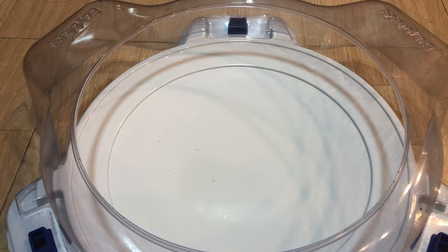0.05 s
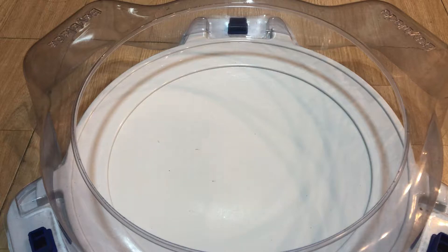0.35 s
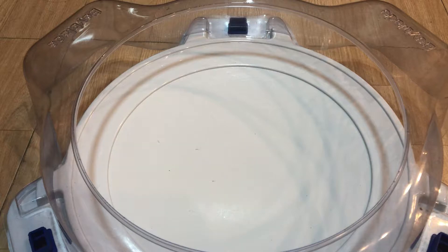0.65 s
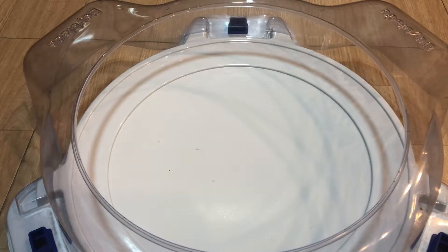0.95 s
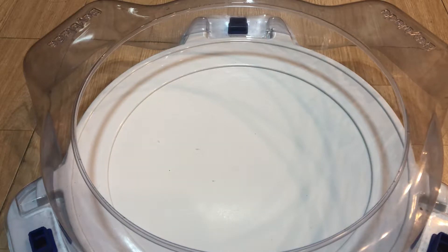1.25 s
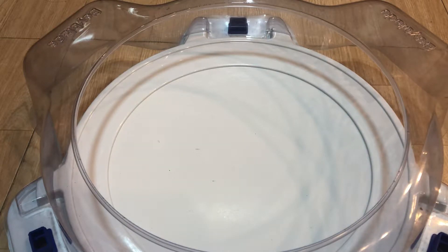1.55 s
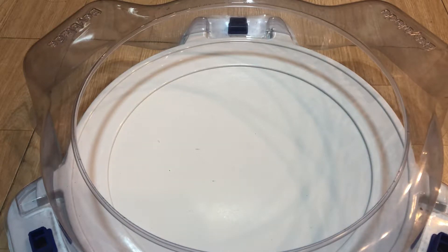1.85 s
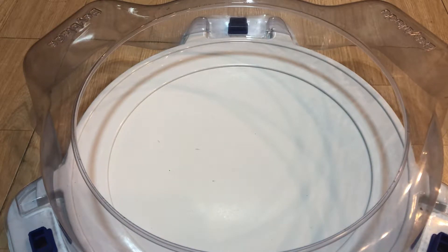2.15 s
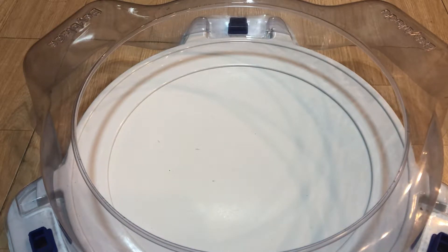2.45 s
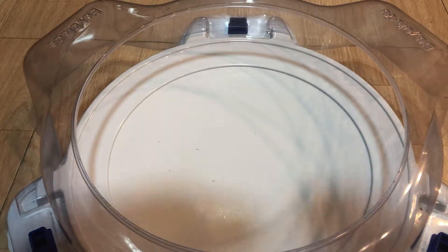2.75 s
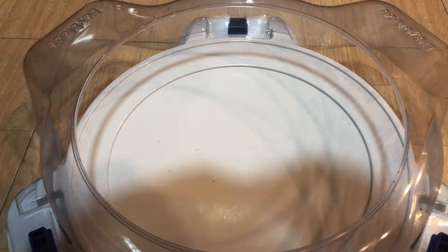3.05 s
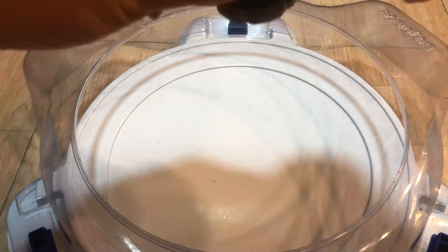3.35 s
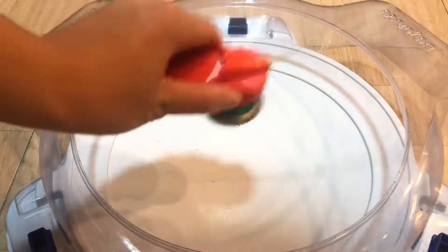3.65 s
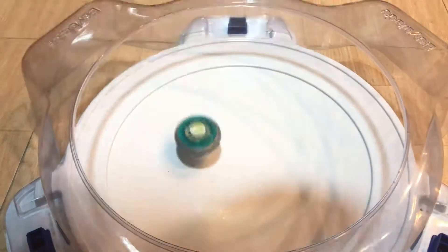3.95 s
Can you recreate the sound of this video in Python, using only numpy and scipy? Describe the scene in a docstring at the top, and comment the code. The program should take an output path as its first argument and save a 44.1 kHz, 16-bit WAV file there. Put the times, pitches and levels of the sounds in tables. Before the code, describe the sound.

A toy top is launched, close by in a small room. First come faint, scattered plastic clicks and dull floor bumps, with two tiny metal clinks around 2.4 seconds. From 3.5 seconds the launcher's gears rip, quickly growing faster and louder, and the top snaps free near 3.7. It hits a thin plastic bowl with a loud hollow crack, scrapes briefly under continued rattling, and lands again at 4 seconds.

```python
"""Launching a toy top

In a small room a toy top is clicked onto its plastic launcher, with dull bumps through the floor.
The launcher is pulled: its gear teeth rip ever faster, the top snaps free, drops into a thin plastic
bowl, bounces and lands again on tip and rim, while the mechanism rattles on.
The close microphone overloads softly on the landings."""
import sys
import numpy as np
from scipy import signal
from scipy.fft import rfft, irfft, next_fast_len
from scipy.io import wavfile
from scipy.ndimage import map_coordinates

SR = 44100
rng = np.random.default_rng(int(sys.argv[2]) if len(sys.argv) > 2 else 0)


def generate_wav(signal):
    """Clip the signal to [-1, 1] and save it as 16-bit WAV at the path in sys.argv[1]."""
    frames = np.transpose(np.atleast_2d(signal))
    scaled = np.clip(frames, -1, 1) * 32767
    pcm = np.round(scaled).astype(np.int16)
    wavfile.write(sys.argv[1], SR, pcm)


N = 176400
TIME = np.arange(N) / SR
HIT_TIME = TIME[:12000]  # seconds since a hit

# The pull. Each row: time in seconds, rattle in dB, teeth per second, treble boost in dB, whirr in dB.
CORD_PULL = [(3.481, -68, 90, 10, -94), (3.52, -56.5, 97.7, 4, -62), (3.555, -48, 124.4, 0.5, -53.5),
             (3.598, -30, 240, -0.5, -47), (3.615, -24, 305, -3, -29.5), (3.642, -25.5, 425, 3.5, -24),
             (3.665, -18.5, 490, -1, -35), (3.684, -26, 490, 9, -46), (3.71, -22, 460, -5, -40),
             (3.744, -64, 500, -10, -65), (3.79, -36, 510, -1, -58), (3.85, -30.5, 420, -2, -49.5),
             (3.92, -32.5, 390, -1.5, -42.5), (4.0, -34, 370, -1, -52)]
# The gears' tone. Each row: harmonic number, level in dB.
GEAR_HARMONICS = [(1, 0.5), (2, -5), (3, -6), (4, -5)]
# The launcher shell's tone colour. Each row: frequency in Hz, level in dB.
SHELL_COLOUR = [(100, -20), (350, -11), (850, -9.5), (1200, -0.5), (1600, -1), (2000, -7.5), (2600, -2.5),
                (4500, -2), (6500, -1), (8200, -4), (11000, -9), (13000, -6.5), (15500, -11)]
# The shell's resonances. Each row: frequency in Hz, width in Hz, level in dB.
SHELL_PEAKS = [(1460, 160, 1), (1600, 160, -0.5), (2330, 230, 9), (4050, 240, 6), (6080, 120, 5.5)]


def launcher(cycles_per_tooth=4, cord_rub=0.6):
    """Teeth tick, the cord rubs and the gears' whirr sweeps up through the shell's resonances."""
    times, *columns = np.transpose(CORD_PULL)
    rattle_db, rate, treble_db, whirr_db = [np.interp(TIME, times, c) for c in columns]
    pulling = TIME > times[0]
    teeth_passed = np.cumsum(rate) / SR
    tooth_number = np.floor(teeth_passed + 0.24 * wobble(300))  # slightly uneven timing
    hits = np.flatnonzero(np.diff(tooth_number) > 0)
    teeth = np.zeros(N)
    teeth[hits] = amp(3.5 * rng.standard_normal(N)[hits])
    contact = signal.fftconvolve(teeth, fade(HIT_TIME, t60=0.005))[:N]
    rattle = (contact / contact[pulling].std() + cord_rub) * rng.standard_normal(N)
    rattle *= amp(rattle_db + wobble(140)) / rattle[pulling].std()  # the spool runs unevenly
    phase = 2 * np.pi * cycles_per_tooth * teeth_passed + 1.35 * wobble(250)
    gears = sum(amp(db + 5.2 * wobble(200)) * np.sin(k * phase) for k, db in GEAR_HARMONICS)
    jolts = 1 + 0.8 * np.cos(2 * np.pi * teeth_passed)  # each tooth jolts the whirr's level
    whirr = amp(whirr_db) * unit(gears) * unit(jolts)
    shell = lambda hz: shape(SHELL_COLOUR)(hz) * np.hypot(1, peaks(SHELL_PEAKS)(hz))
    rip = coloured((rattle + whirr) * pulling, shell)
    treble = signal.sosfiltfilt(signal.butter(3, 8000, "high", fs=SR, output="sos"), rip)
    return in_room(rip + (amp(treble_db) - 1) * treble, wet_db=-7)


# The top hits the bowl. Each row: start in seconds, thump in dB, crack in dB.
BOWL_HITS = [(3.7582, -11.5, -6), (3.9884, -12, -8.5), (3.9928, -17, -28)]
# The bowl's ringing notes. Each row: frequency in Hz, level in dB, seconds to fade by 60 dB.
BOWL_NOTES = [(228.5, -2.5, 0.44), (302.5, 5, 0.17), (339, 2, 0.25), (416, 4, 0.14), (445, 1, 0.062),
              (527, 2, 0.16), (575, -1.5, 0.28), (662, -13, 0.28), (726, -3.5, 0.38), (893, -13, 0.2),
              (1026, -12, 0.4), (1580, -8, 0.56)]
# The bowl's thin cover shakes. Each row: peak time in seconds, level in dB, spread in seconds.
COVER_SHUDDERS = [(3.788, -15.5, 0.01), (3.815, -26, 0.023)]
# Tone colours of the crack, the flexing bowl and its cover. Each row: frequency in Hz, level in dB.
CRACK_COLOUR = [(90, -15), (350, 3), (1000, 1), (1550, 10.5), (2100, 2), (3200, 6.5), (6000, -1.5),
                (7500, 3), (10000, -3.5), (12000, -2), (15500, 0.5)]
FLEX_COLOUR = [(40, -12), (130, -7.5), (230, -2), (350, -5), (520, -0.5), (750, -13.5), (1300, -36.5),
               (3000, -53)]
COVER_COLOUR = [(130, -25), (220, 3), (400, -9), (560, 3), (740, 2.5), (1100, -11.5), (1330, -11.5),
                (1550, -14), (2000, -15), (2900, -17), (6000, -36)]


def bowl(flex_delay_s=0.00304, lowest_hz=133):
    """The tip cracks on the bowl, which flexes once and rings like a drum; its cover shudders."""
    out = coloured(swells(COVER_SHUDDERS) * grit(rough_db=0.5, rate=200), shape(COVER_COLOUR))
    flex = amp(28) * coloured(signal.unit_impulse(len(HIT_TIME)), shape(FLEX_COLOUR))
    for start, thump_db, crack_db in BOWL_HITS:
        add(out, start, amp(crack_db) * burst(0.021, shape(CRACK_COLOUR)))
        thump = flex + amp(-2.5) * ring(BOWL_NOTES, scatter_db=2.5)
        add(out, start + flex_delay_s, amp(thump_db) * thump)
    out = signal.sosfilt(signal.butter(2, lowest_hz, "high", fs=SR, output="sos"), out)
    return in_room(out, wet_db=-9.5)


# The top snaps free. Each row: start in seconds, level in dB, hollow ring and bright ring in dB
# compared with the crack, seconds to fade by 60 dB.
PRONG_SNAPS = [(3.668, -7.5, -1, 3, 0.0077), (3.675, -15.5, 4.5, 2, 0.023), (3.68, -9, -2, 0, 0.0087),
               (3.6851, -16.5, 1, -5, 0.014), (3.6961, -16.5, -12, -15, 0.022),
               (3.7178, -18, -5, -18, 0.0091), (3.7251, -14, 8, -27, 0.0095)]


def release():
    """Hard snaps as the top leaves the launcher's prongs, each with a hollow and a bright ring."""
    out = np.zeros(N)
    for start, db, hollow_db, bright_db, t60 in PRONG_SNAPS:
        hollow = amp(hollow_db) * burst(t60, lambda hz: peaks([(1575, 330, 0)])(hz) ** 2)
        bright = amp(bright_db) * burst(t60, peaks([(12800, 1100, 0)]))
        crack = burst(t60, shape(CRACK_COLOUR))
        add(out, start, amp(db) * (crack + hollow + bright))
    return in_room(out, wet_db=-6.5)


# Spinning parts scrape. Each row: peak time in seconds, level in dB, spread in seconds.
SPIN_SCRAPES = [(3.886, -26, 0.006), (3.918, -21, 0.0031), (3.928, -22, 0.0021), (3.9535, -18.5, 0.0029)]
# Their tone colour. Each row: frequency in Hz, level in dB.
SCRAPE_COLOUR = [(300, -18), (1200, -5.5), (2700, 1.5), (4500, -2), (6300, 2.5), (8200, -12.5),
                 (15500, -15.5)]


def scrapes():
    """Short gritty rubs of the spinning parts."""
    friction = swells(SPIN_SCRAPES) * grit(rough_db=3.5, rate=1300)
    return in_room(coloured(friction, shape(SCRAPE_COLOUR)), wet_db=-10)


# Plastic parts click. Each row: start in seconds, level in dB, low boost in dB, treble boost in dB,
# the part's resonance in Hz, seconds to fade by 60 dB, room echo in dB.
PART_CLICKS = [(0.735, -50, 10, -11, 2250, 0.022, 7.5), (0.7696, -38, -2, -3, 2490, 0.049, -3.5),
               (0.83, -54, 8, -12, 1500, 0.03, -7), (1.529, -33.5, 3.5, -1.5, 5140, 0.046, -3.5),
               (1.5933, -36.5, 0.5, -3, 1730, 0.018, -0.5), (1.72, -46.5, -1, -1, 1470, 0.032, -11),
               (1.73, -38.5, 6, 0, 5350, 0.028, -3), (1.785, -50, 7.5, 5, 5470, 0.036, -2),
               (1.8215, -48, 3, -9, 1470, 0.025, -2), (1.831, -43.5, 3.5, -5, 7900, 0.037, -3),
               (1.8595, -34.5, -2.5, 2, 5300, 0.037, 1), (1.8761, -34.5, 4.5, 4, 3970, 0.085, -7),
               (2.04, -53.5, 6, 3, 4500, 0.034, 1.5), (2.097, -45, 7, -10, 2300, 0.015, -11),
               (2.1036, -38.5, 0.5, -6, 3640, 0.02, -3.5), (2.1305, -52.5, 1, 2, 12900, 0.05, -3),
               (2.3372, -47.5, 9.5, -14, 1500, 0.036, -1.5), (2.3642, -41, -11.5, -1.5, 7100, 0.034, -1.5),
               (2.425, -49.5, 1.5, -1, 3060, 0.04, 1), (2.6908, -59, 6, -24, 3170, 0.021, 2),
               (2.8087, -43.5, -0.5, -6, 4350, 0.035, -11.5), (2.905, -51, 8.5, -6, 2950, 0.028, -15),
               (2.991, -53.5, 12, -5, 6800, 0.024, -12), (3.048, -56.5, 10, -15, 6560, 0.044, -10),
               (3.1, -52.5, 9, 4, 9600, 0.049, -17), (3.143, -50, 1, 3.5, 5600, 0.035, -13),
               (3.176, -59, -6, 2, 7200, 0.018, -15), (3.1987, -54.5, 20, -4, 2100, 0.032, -19),
               (3.311, -55.5, 1, -6, 2230, 0.017, -8), (3.4025, -49.5, 9, -11, 1220, 0.04, -6.5),
               (3.4464, -42.5, 9.5, 1.5, 1200, 0.074, -11)]
# The plastic's tone colour. Each row: frequency in Hz, level in dB.
PLASTIC_COLOUR = [(100, -47), (400, -8.5), (850, -7), (1150, -1.5), (1550, 3), (2200, 0.1), (3000, -1),
                  (4000, -1), (4700, -4), (6200, -3), (8500, -9), (12000, -15.5), (15500, -17.5)]


def clicks():
    """Plastic parts knock as the top goes onto the launcher, each with its own resonance."""
    out = np.zeros(N)
    for start, db, low_db, high_db, part_hz, t60, wet_db in PART_CLICKS:
        tilt = shape([(1700, low_db), (3000, 0), (6000, 0), (10000, high_db)])
        part = peaks([(part_hz, part_hz / 11, 7)])
        colour = lambda hz: tilt(hz) * shape(PLASTIC_COLOUR)(hz) * np.hypot(1, part(hz))
        add(out, start, in_room(amp(db) * burst(t60, colour), wet_db))
    return out


# The metal disc clinks. Each row: start in seconds, level in dB, treble cutoff in Hz.
DISC_CLINKS = [(2.363, -42, 13500), (2.425, -45, 6200)]
# The disc's resonances. Each row: frequency in Hz, width in Hz, level in dB.
DISC_PEAKS = [(4360, 300, -3), (5800, 770, 1), (7200, 400, -4.5), (10200, 510, 0.5), (13100, 800, -4)]


def disc():
    """The top's metal disc rings as it settles into place."""
    out = np.zeros(N)
    for start, db, cutoff_hz in DISC_CLINKS:
        # squaring narrows the peaks and doubles their dB
        colour = lambda hz: peaks(DISC_PEAKS)(hz) ** 2 / np.hypot(1, (hz / cutoff_hz) ** 6)
        add(out, start, in_room(amp(db) * burst(0.049, colour), wet_db=-4.5))
    return out


def loose_parts(typical_hz=2240):
    """Loose parts tick faintly as the launcher is lifted."""
    out = np.zeros(N)
    for start in rng.uniform(2.66, 3.22, size=22):
        strength, pitch = rng.standard_normal(2)
        part_hz = typical_hz * 2 ** (0.78 * pitch)
        colour = lambda hz: shape(PLASTIC_COLOUR)(hz) * peaks([(part_hz, part_hz / 3.2, 0)])(hz)
        add(out, start, amp(-62.5 + 0.5 * strength) * burst(0.023, colour))
    return out


# Finger slides. Each row: peak time in seconds, level in dB, spread in seconds.
FINGER_RUBS = [(1.222, -65.5, 0.019), (2.8, -67, 0.0092), (3.06, -70.5, 0.025), (3.41, -63.5, 0.027)]
# Their tone colour. Each row: frequency in Hz, level in dB.
FINGER_COLOUR = [(300, -1), (1400, 2.5), (3000, -4.5), (5300, -6), (6750, 6), (8200, -15), (12500, -8),
                 (15500, -10)]


def fingers():
    """Fingers catch and slip on the plastic."""
    return coloured(swells(FINGER_RUBS) * grit(rough_db=3.5, rate=1300), shape(FINGER_COLOUR))


# Bumps through the floor. Each row: peak time in seconds, level in dB, spread in seconds.
FLOOR_BUMPS = [(0.532, -50.5, 0.07), (0.833, -54, 0.054), (1.21, -56, 0.02), (1.561, -53, 0.069),
               (1.972, -56.5, 0.095), (2.69, -52.5, 0.058), (3.056, -54, 0.059), (3.272, -60.5, 0.054)]
# Their tone colour. Each row: frequency in Hz, level in dB.
BOOM_COLOUR = [(30, -28), (70, 0), (95, -1), (125, -5), (170, 1.5), (300, -9.5), (700, -26), (2000, -38.5)]


def floor_bumps(floor_hz=89):
    """Dull bumps swell in the floor's low resonance."""
    note = np.sin(2 * np.pi * floor_hz * TIME + 0.39 * wobble(11))
    boom = amp(-6) * coloured(rng.standard_normal(N), shape(BOOM_COLOUR))
    return swells(FLOOR_BUMPS) * (note + boom)


# The quiet room's tone colour. Each row: frequency in Hz, level in dB.
ROOM_COLOUR = [(15, -71), (25, -43.5), (53, -12), (69, -7), (91, 0), (119, -12), (221, -9.5), (281, -14),
               (359, -15), (582, -22), (1080, -25.5), (2490, -32.5), (15500, -44)]


def room_tone():
    """A faint low rumble whose level wavers."""
    return amp(-62.5 + 2.24 * wobble(6.94)) * coloured(rng.standard_normal(N), shape(ROOM_COLOUR))


# The room's echo. Each row: frequency in Hz, seconds to fade by 60 dB.
ROOM_DECAY = [(150, 0.49), (1500, 0.38), (6000, 0.39), (10000, 0.35), (16000, 0.34)]


def in_room(x, wet_db, build_s=0.0056):
    """Add the room's echo at wet_db: it builds quickly, and the low notes last longest."""
    hz, t, noise = signal.stft(rng.standard_normal(SR // 2), SR, nperseg=256)
    decay = fade(t, along(ROOM_DECAY, hz)[:, None])
    build = 1 - np.exp(-t / build_s)
    tail = signal.istft(noise * decay * build, SR, nperseg=256)[1]
    response = amp(wet_db) * tail / np.linalg.norm(tail)
    response[0] += 1  # the direct sound
    return signal.fftconvolve(x, response)[:N]


def burst(t60, gain):
    """A contact: filtered noise that dies quickly."""
    return coloured(rng.standard_normal(len(HIT_TIME)) * fade(HIT_TIME, t60), gain)


def ring(notes, scatter_db):
    """Fading notes, their balance a little different at each blow."""
    gains = amp(np.array(notes)[:, 1] - scatter_db * rng.standard_normal(len(notes)))
    gains *= np.sqrt(2) / np.linalg.norm(gains)
    return sum(gain * np.sin(2 * np.pi * hz * HIT_TIME) * fade(HIT_TIME, t60)
               for gain, (hz, _, t60) in zip(gains, notes))


def grit(rough_db, rate):
    """Friction: noise that catches and slips, rate times a second."""
    return unit(rng.standard_normal(N) * amp(rough_db * wobble(rate)))


def swells(rows):
    """A bell-shaped rise and fall in level for each row."""
    return sum(amp(db) * np.exp(-.5 * ((TIME - peak) / spread) ** 2) for peak, db, spread in rows)


def wobble(rate):
    """A smooth curve through rate random values a second."""
    return map_coordinates(rng.standard_normal(4096), [TIME * rate], mode="wrap")


def coloured(x, gain):
    """Filter x by a gain curve over frequency; white noise keeps its power."""
    size = 2 * next_fast_len(len(x) // 2 + 2048)
    gains = unit(gain(np.fft.rfftfreq(size, 1 / SR)))
    cepstrum = irfft(np.log(np.maximum(gains, 1e-6)), size)
    # make the filter ring only after a hit, never before
    cepstrum[1:size // 2] *= 2
    cepstrum[size // 2 + 1:] = 0
    return irfft(rfft(x, size) * np.exp(rfft(cepstrum)), size)[:len(x)]


def shape(points):
    """Gain curve through (Hz, dB) points."""
    return lambda hz: amp(along(points, hz))


def peaks(rows):
    """Gain curve of resonances, each given as centre in Hz, width in Hz, level in dB."""
    return lambda hz: np.sqrt(sum(
        abs(amp(db) * hz * width / (centre ** 2 - hz ** 2 + 1j * hz * width)) ** 2
        for centre, width, db in rows))


def along(points, hz):
    """Read between (Hz, value) points on a log frequency axis."""
    freqs, values = np.transpose(points)
    return np.interp(np.log(hz + 1), np.log(freqs + 1), values)


def fade(t, t60):
    """Die away by 60 dB every t60 seconds."""
    return 1000. ** (-t / t60)


def amp(db):
    """Decibels to gain."""
    return 10 ** (np.asarray(db) / 20)


def unit(x):
    """Scale to an average power of 1."""
    return x / np.sqrt(np.mean(x ** 2) + 1e-20)


def add(out, start, x):
    """Mix x into out at start seconds."""
    part = out[round(start * SR):][:len(x)]
    part += x[:len(part)]


def scene():
    """All sources at one microphone."""
    background = room_tone() + floor_bumps()
    handling = fingers() + clicks() + disc() + loose_parts()
    launch = launcher() + release() + scrapes() + bowl()
    return (background + handling + launch)[None]


def record(dry, start_s=0.069, top_hz=16200, slope_hz=700):
    """The sound opens after a moment; the loudest peaks are rounded and the highest treble is cut."""
    x = dry * np.clip((TIME - start_s) / .004, 0, 1)
    x = x / (1 + abs(x) ** 4) ** (1 / 4)  # soft overload
    size = next_fast_len(N + SR // 2)
    low_pass = np.clip((top_hz - np.fft.rfftfreq(size, 1 / SR)) / slope_hz, 0, 1) ** 2
    return irfft(rfft(x, size) * low_pass, size)[..., :N]


dry = scene()
out = record(dry)
generate_wav(out)
```